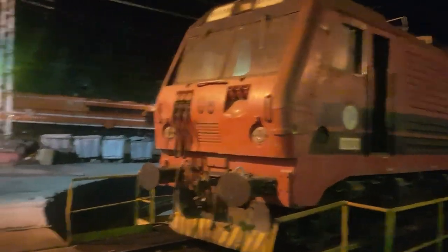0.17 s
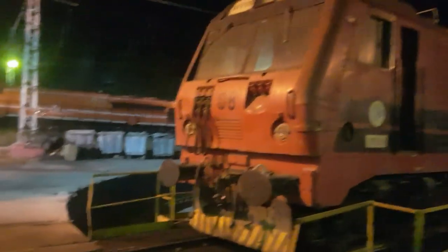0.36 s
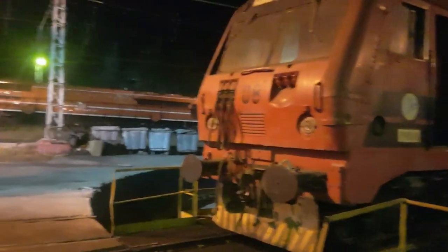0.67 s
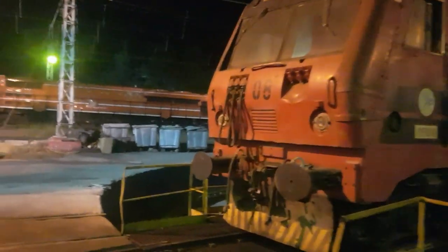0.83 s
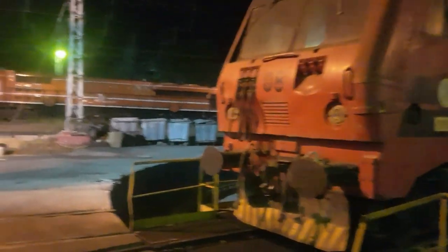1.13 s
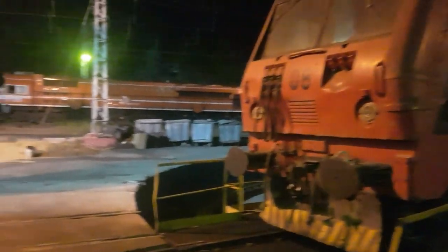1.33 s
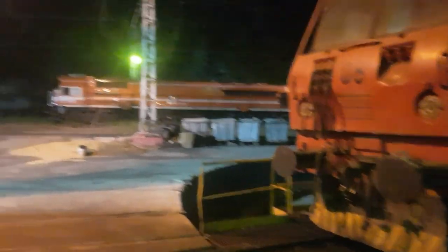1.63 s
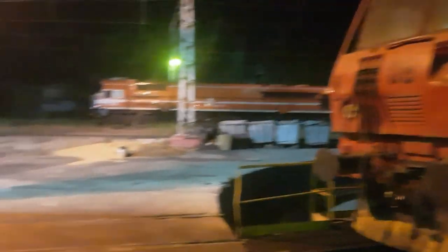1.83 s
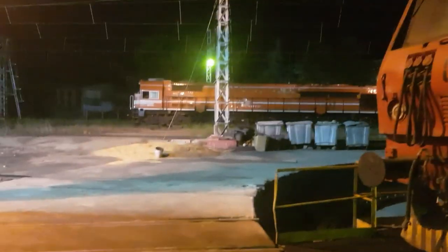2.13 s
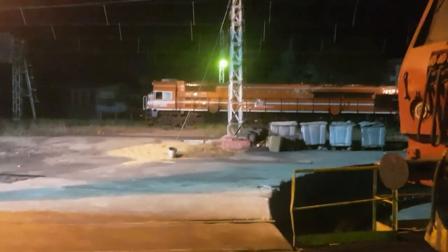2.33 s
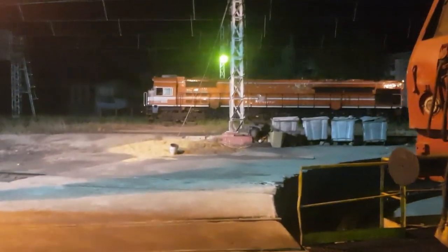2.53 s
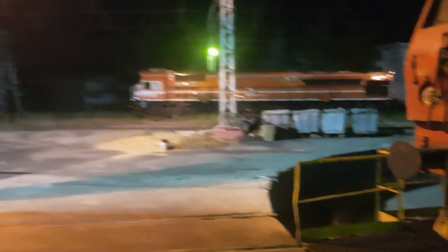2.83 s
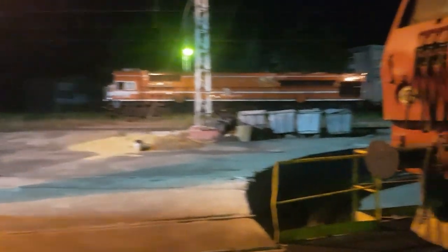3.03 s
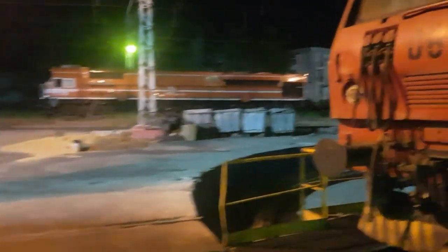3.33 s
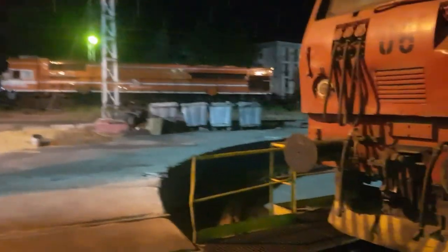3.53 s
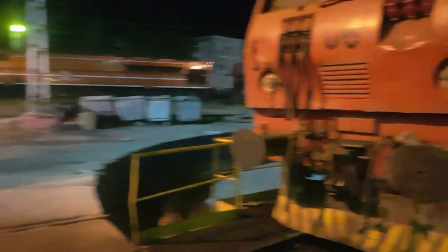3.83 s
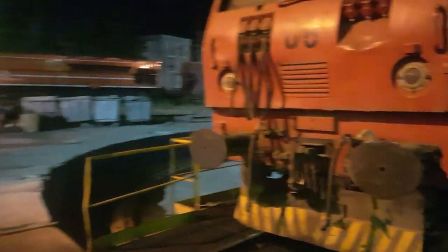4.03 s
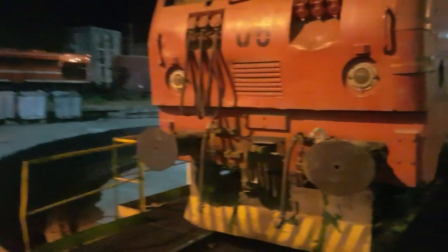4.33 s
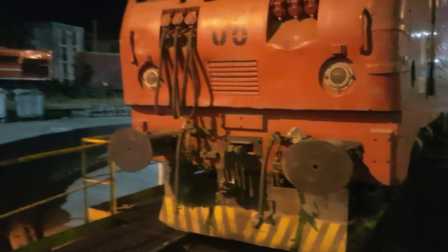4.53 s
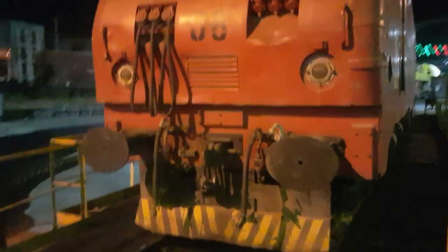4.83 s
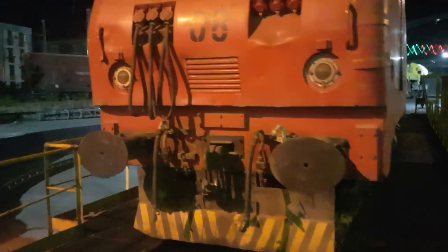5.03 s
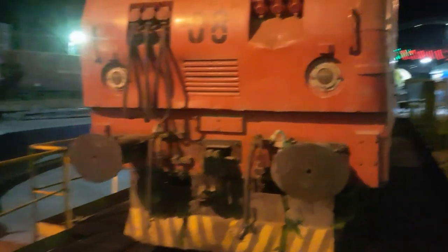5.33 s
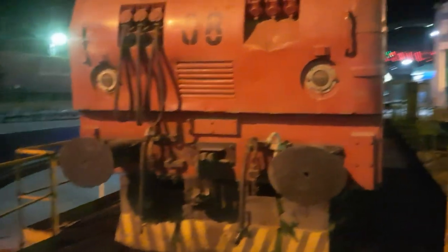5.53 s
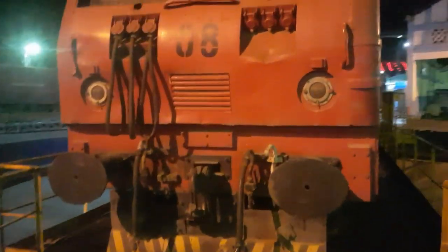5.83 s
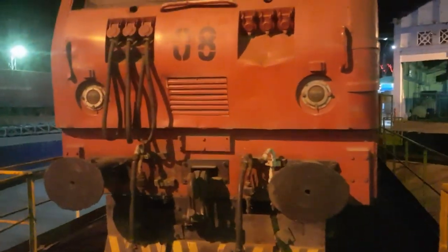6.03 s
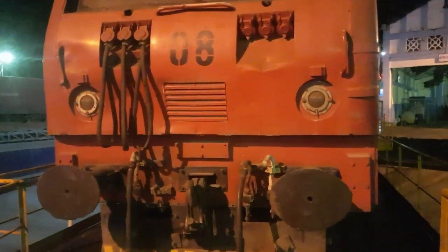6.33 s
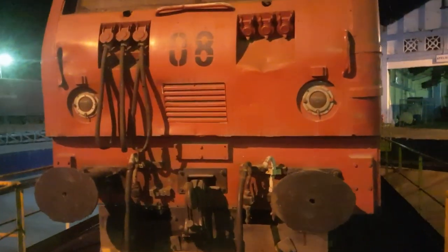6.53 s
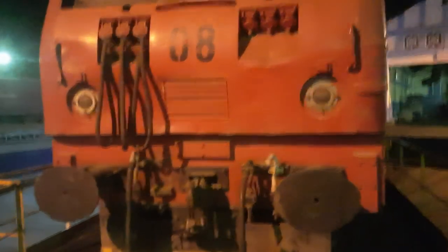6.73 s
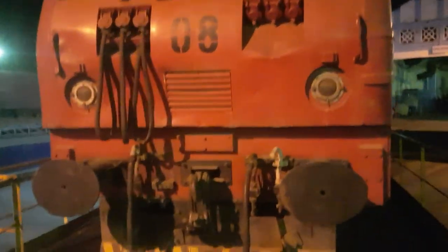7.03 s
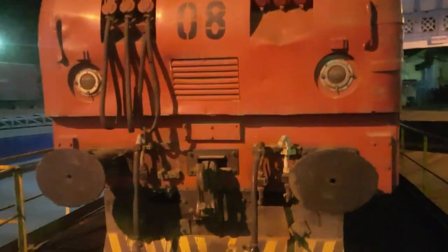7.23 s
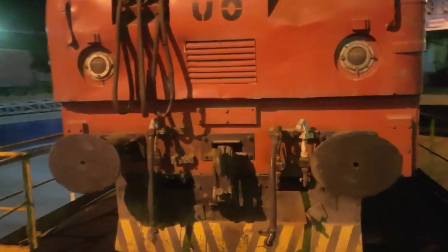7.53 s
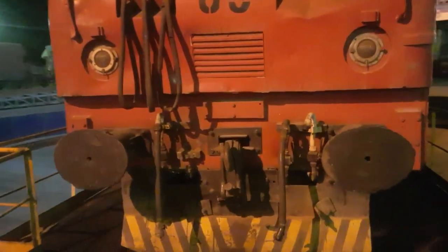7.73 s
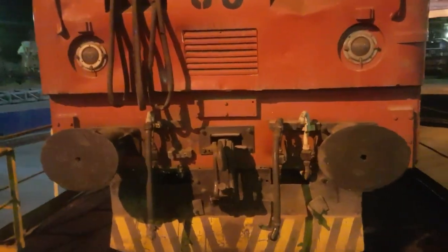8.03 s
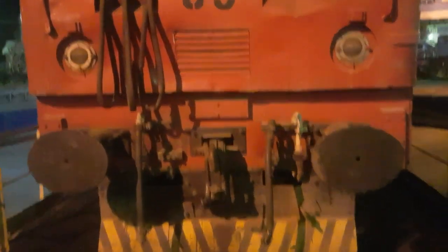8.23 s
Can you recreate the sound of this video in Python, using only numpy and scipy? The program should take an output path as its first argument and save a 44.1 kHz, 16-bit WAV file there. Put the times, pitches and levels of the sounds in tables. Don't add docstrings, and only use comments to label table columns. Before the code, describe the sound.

A big diesel locomotive idles close by at night, deep throbbing exhaust under fan roar and thin whines, with a sharp air-valve spit late on.

```python
import sys
import numpy as np
from scipy import signal
from scipy.fft import rfft, irfft
from scipy.io import wavfile
from scipy.ndimage import uniform_filter1d

SR = 44100
rng = np.random.default_rng(int(sys.argv[2]) if len(sys.argv) > 2 else 0)


def to_wav(sig):
    pcm = np.clip(np.atleast_2d(sig), -1, 1) * 32767
    pcm = np.round(pcm).astype(np.int16)
    wavfile.write(sys.argv[1], SR, pcm.T)


def gain_from_db(level_db):
    decades = np.asarray(level_db, float) / 20
    return 10 ** decades


N = 369558
T = np.arange(N) / SR
HZ = np.maximum(np.arange(N // 2 + 1) * SR / N, 1)
CYCLE_HZ = 4.8409

# strength in dB, lateness in its branch pipe in ms.
CYLINDERS = [
    [(2.7, -0.0), (4.6, -0.4), (2.6, 0.3), (-2.9, -4.0), (0.7, -2.8), (2.3, -3.1), (-14.4, -3.3),
     (2.5, -4.3), (1.8, 3.0), (5.7, -5.0), (-20.0, 5.0), (-12.4, 2.9), (3.2, -0.4), (1.2, -1.7),
     (8.0, -0.3), (4.3, 0.1)],
    [(0.1, 2.3), (-3.7, -5.0), (0.4, -2.8), (-20.0, -0.3), (-0.8, -4.8), (-11.1, 5.0), (-5.2, 1.0),
     (8.0, 1.7), (-2.5, -0.7), (7.7, 2.2), (0.4, 5.0), (6.0, 1.6), (1.2, 3.6), (-1.0, 1.5), (-4.9, -1.8),
     (-3.6, 1.8)],
]
# time in seconds, lag of the right port behind the left in ms.
TURN = [(0, 0.12), (2, -0.038), (3.2, -0.036), (4.2, 0.15), (5.5, 0.31), (8.38, 0.36)]
# opens in seconds, shuts in seconds, echo level on shutting in dB,
# body level in dB, gain lost afterwards in dB.
BLOWS = [
    (-.3, 0.061, -38.5, 1, 5),
    (6.714, 7.068, -42.5, 1.5, 2.5),
]


def curve(table):
    s, *columns = np.transpose(table)
    return [np.interp(T, s, c) for c in columns]


def ring(x, hz, width):
    return signal.lfilter(*signal.iirpeak(hz, hz / width, fs=SR), x)


def walk(rate):
    k = int(SR / rate)
    steps = np.repeat(rng.standard_normal(N // k + 1), k)
    return 1.264 * uniform_filter1d(uniform_filter1d(steps, k), k)[:N]


def swell(start, rise, hold, fall_db_s):
    return np.clip((T - start) / rise, 0, 1) ** 1.5 * gain_from_db(-fall_db_s * np.maximum(T - hold, 0))


def ports(common, left, right, lag_ms=0):
    late = np.interp(T - (curve(TURN)[0] + lag_ms) / 1000, T, common[1])
    return np.array([common[0] + left, late + right])


def air(colour, edges_hz, gains, spread, lag_ms=0):
    # frequency in Hz, share of sound common to both from 0 to 1.
    alike = [(100, 1), (400, 0.9), (900, 0.63), (2300, 0.36), (3500, 0.06), (10000, 0.07), (15000, 0.4)]
    hz, *db = np.transpose(colour)
    tint = gain_from_db(np.array([np.interp(np.log(HZ), np.log(hz), d) for d in db]))
    alike_hz, alike_share = np.transpose(alike)
    share = np.clip(np.interp(np.log(HZ), np.log(alike_hz), alike_share), 0, 1) ** spread
    common, left, right = rfft(rng.standard_normal((3, N)))
    both = tint * common * np.sqrt(share)
    own = tint * np.array([left, right]) * np.sqrt(1 - share)
    place = np.interp(np.log(HZ), np.log(edges_hz), np.arange(len(edges_hz)))
    out = np.zeros((4, N))
    for k, gain in enumerate(gains):
        band = np.cos(np.pi / 2 * np.clip(place - k, -1, 1))
        out += gain * irfft(band * np.vstack([both, own]), N)
    return ports(out[:2], *out[2:], lag_ms)


def strokes(cylinders, scatter_db):
    db, late_ms = np.transpose(cylinders)
    k = np.arange(-64, 16 * 42)
    at = (1 + k / 16 / CYCLE_HZ + late_ms[k % 16] / 1000) * SR
    size = gain_from_db(db[k % 16] + scatter_db * rng.standard_normal(len(k))) * SR / 32 / CYCLE_HZ
    pulses, whole = np.zeros(N + 2 * SR), at.astype(int)
    np.add.at(pulses, whole, size * (1 - at + whole))
    np.add.at(pulses, whole + 1, size * (at - whole))
    return pulses


def exhaust():
    # frequency in Hz, width in Hz, level in dB.
    stacks = [
        [(48.1, 45.0, -2.2), (85.9, 17.7, 12.6), (120.0, 80.0, -30.0)],
        [(30.0, 45.0, -11.5), (80.4, 16.0, 9.5), (159.4, 18.2, -7.4)],
    ]
    # time in seconds, first stack delay in ms, second stack delay in ms.
    delays = [(0, -30.55, 36.38), (1.2, -30.15, 36.47), (2.1, -29.6, 36.62), (3.0, -29.56, 36.54),
              (4.3, -30.6, 36.36), (5.4, -30.7, 36.13), (6.0, -30.33, 36.4), (7.1, -29.5, 37.1),
              (8.38, -29.6, 37.0)]
    # time in seconds, first stack in dB, both stacks' upper resonance in dB.
    shade = [(0, 0, 4), (1.8, 2, 6), (3.0, -1.5, 4), (3.6, -4, 7), (4.75, -1.5, -3), (5.7, -0.5, 3.5),
             (7.8, -2, 2), (8.38, -2, 2.2)]
    # time in seconds, strength from 0 to 1.
    boom_strength = [(0, .9), (1.2, .85), (1.8, .5), (2.4, 0), (8.38, 0)]
    boom_ms, boom_hz, boom_width = 49.1, 76, 7
    first_db, upper_db = curve(shade)
    stack_db = [-25.5 + first_db, -21.5]
    out = 0
    for cylinders, stack, delay_ms, db in zip(CYLINDERS, stacks, curve(delays), stack_db):
        pulses = strokes(cylinders, scatter_db=0.79)
        clock = np.arange(len(pulses))
        sent = (1 + T - delay_ms / 1000) * SR
        rings = [gain_from_db(d) * ring(ring(pulses, hz, w), hz, w) for hz, w, d in stack]
        low, main, upper = (np.interp(sent, clock, r) for r in rings)
        out = out + gain_from_db(db) * (low - main + gain_from_db(upper_db) * upper)
        boom = ring(rings[0] - rings[1], boom_hz, boom_width)
        back = np.interp(sent - boom_ms / 1000 * SR, clock, boom)
        out = out + gain_from_db(db) * curve(boom_strength)[0] * back
    skew = (curve(TURN)[0] + 0.04) / 2000
    pair = np.array([np.interp(T + skew, T, out), np.interp(T - skew, T, out)])
    return pair * gain_from_db(np.array([[-.35], [.35]]))


def block(load_db):
    # frequency in Hz, width in Hz, level in dB.
    modes = [(290, 110, -59), (473.6, 11, -62), (641, 24, -60), (746, 67, -61), (962, 120, -60)]
    # frequency in Hz, rms level in dB.
    shafts = [(188.8, -55), (193.6, -54.5), (232.4, -59), (271.1, -54.5), (457.6, -56), (620, -61.5),
              (660, -64), (705, -68), (737.5, -59.5), (3209, -87), (5502, -82), (6008, -79.5)]
    decay = np.exp(-1 / (.005 * SR))
    burst = signal.lfilter([1], [1, -decay], strokes(CYLINDERS[1], scatter_db=1.2))[SR:SR + N]
    shake = burst / burst.std() * rng.standard_normal((2, N))
    knock = 0
    for hz, width, db in modes:
        knock = knock + gain_from_db(db) * np.sqrt(SR / width) * ring(ring(shake, hz, width), hz, 4 * width)
    tones = 0
    for hz, db in shafts:
        sway_db = 2.5 * walk(3.31)
        tones = tones + gain_from_db(db + sway_db) * np.sqrt(2) * np.sin(2 * np.pi * (hz * T + rng.random()))
    return gain_from_db(load_db) * ports([knock[0] + tones] * 2, 0.13 * knock[1], -.4 * knock[1])


def roar():
    # frequency in Hz, left in dB per Hz, right in dB per Hz.
    colour = [(30, -8.5, -8), (114, 2.5, -7.5), (253, -4, -3.5), (447, -8, -8.5), (638, 1, 4.5),
              (1068, -8, -8), (1900, -12, -8.5), (2340, -4.5, -9), (3053, -14, -26.5), (4250, -37.5, -23.5),
              (6120, -52.5, -28.5), (8800, -63, -46.5), (9360, -63, -40), (12900, -60, -50.5)]
    # time in seconds, level in dB.
    louvres = [(0, 0.5), (2.3, 4), (3.9, -1), (5.6, 1), (6.9, 2.5), (8.38, 2)]
    open_db = curve(louvres)[0]
    centres = 60 * 2 ** np.arange(0, 8.1, .8)
    breath = np.cos(2 * np.pi * (CYCLE_HZ * T - .25))
    gains = []
    for hz in centres:
        if hz < 2000:
            tilt_db = 0
        elif hz < 3500:
            tilt_db = open_db
        else:
            tilt_db = 3 - .3 * open_db + 1
        if hz > 8000:
            tilt_db = tilt_db + 2.6 * breath + 0.66 * open_db - 3.5
        flicker_db = .6 * walk(2.5) + 0.83 * walk(12)
        gains.append(gain_from_db(-43 + tilt_db + flicker_db + 18))
    return air(colour, centres, gains, spread=0.99)


def ground(x):
    # time in seconds, extra path in ms, strength from 0 to 1.
    bounce = [(0, 1.8, .4), (.6, 1.8, .62), (2.4, 1.78, .62), (3.1, 1.74, .55), (3.6, 1.66, .3),
              (5, 1.66, .28), (8.38, 1.7, .3)]
    ms, strength = curve(bounce)
    dull = signal.filtfilt(*signal.butter(2, 2000, fs=SR), x)
    return x - np.clip(strength, 0, 1) * np.array([np.interp(T - ms / 1000, T, c) for c in dull])


def whine(hz, table, width, steady, throb_db, throb_at, fade_db, sway_db):
    db = curve(table)[0] + fade_db * walk(3.5)
    pan_db = sway_db * walk(3)
    rough = ring(ring(rng.standard_normal((3, N)), hz, width), hz, width)
    rough = rough / rough.std()
    drifting_hz = hz + 2.5 * walk(6)
    tone = steady * np.sin(2 * np.pi * np.cumsum(drifting_hz) / SR) + 0.64 * rough[0]
    throb = throb_db * np.cos(2 * np.pi * (CYCLE_HZ * T - throb_at))
    gain = gain_from_db(db + throb + np.array([pan_db, -pan_db]) / 2)
    return gain_from_db(4.0) * ports(gain * tone, *(gain * rough[1:]))


def gear():
    # time in seconds, level in dB.
    level = [(0, -48), (.7, -52.5), (2.2, -51.5), (2.8, -48), (3.4, -49), (4.1, -58), (4.5, -50.5),
             (5.6, -55.5), (6.1, -54), (6.8, -50), (7.301, -53), (8.38, -53.5)]
    return whine(2135, level, width=24, steady=0.41, throb_db=2.5, throb_at=0.11, fade_db=-0.4, sway_db=4.5)


def blower():
    # time in seconds, level in dB.
    level = [(0, -57.5), (1.0, -56.5), (1.6, -57), (3.3, -59), (4.8, -62.5), (6.5, -57), (7.0, -62.5),
             (7.6, -58), (8.38, -58.5)]
    return whine(4361, level, width=50, steady=0.78, throb_db=0.8, throb_at=0.8, fade_db=-1.4, sway_db=4)


def near_valve():
    # frequency in Hz, left in dB per Hz, right in dB per Hz.
    jets = [
        [(120, -10, -12), (255.6, -16, -16), (450, -15.5, -17.5), (715, -20, -16), (1060, -16, -10), (1770, -4.5, -6), (2370, -3, -7), (3020, -8.5, -22), (5060, -20, -8), (6460, -22, -12.5), (7920, -33.5, -15), (9540, -27.5, -15.5), (13000, -31, -7), (16400, -41, -25)],
        [(120, -8, -20), (250, -13, -11), (450, -14, -13.5), (690, -19, -28), (1020, -8.5, -6), (1730, -6.5, -11), (2250, 0, 0), (3080, -13, -23), (4860, -18.5, -7.5), (5970, -22.5, -7.5), (8460, -40, -20.5), (9360, -32.5, -19.5), (13300, -28.5, -9), (16300, -34, -20.5)],
    ]
    # start in seconds, level in dB, fall in dB per second.
    spurt_sets = [
        [(-0.041, -24, 269.5)],
        [(6.721, -26, 66), (6.88, -32.5, 141), (7.005, -36, 260)],
    ]
    # frequency in Hz, width in Hz, boost in dB.
    hollow_sets = [
        [(2000, 300, 1.5), (2650, 300, 0), (4900, 450, 13)],
        [(1680, 150, 4), (2085, 90, 9), (2480, 150, 6), (2750, 110, 0), (12800, 500, 1.5)],
    ]
    # level in dB, fall in dB per second.
    yard = [
        (10.5, 29.5),
        (3, 48.5),
        (-6, 100),
    ]
    rise_s, hold_s, sizzle_db = 0.03, 0.017, 4.5
    edges_hz, trims = [2200, 5500, 11000], gain_from_db(np.array([-4, 0, -.5]))
    lags_ms = .16, -.05
    out = 0
    for colour, blow, spurts, hollows, lag_ms in zip(jets, BLOWS, spurt_sets, hollow_sets, lags_ms):
        opens, shuts, echo_db, body_db, _ = blow
        power = 0
        for s, db, fall in spurts:
            power = power + (gain_from_db(db) * swell(s, rise_s, s + rise_s + hold_s, fall)) ** 2
        flow = np.sqrt(power)
        sputter = gain_from_db(1.3 * walk(45) + 21.5)
        gains = [sputter * trim * gain_from_db(db) * flow for db, trim in zip([body_db, 0, sizzle_db], trims)]
        jet = air(colour, edges_hz, gains, spread=.14, lag_ms=lag_ms)
        echoes = [gain_from_db(echo_db + db) * swell(opens, 0.17, shuts, fall) for db, fall in yard]
        echo_gains = [gain_from_db(21) * trim * echo for echo, trim in zip(echoes, trims)]
        echo = air(colour, edges_hz, echo_gains, spread=.45, lag_ms=lag_ms)
        singing = (flow / flow.max()) ** .7 * gain_from_db(0) * np.array([[1], [1]])
        singing = singing * gain_from_db(np.array([[.7], [-.7]]))
        out = out + jet + echo + singing * sum(gain_from_db(boost) * ring(jet, hz, w) for hz, w, boost in hollows)
    return out


def far_valves():
    # start in seconds, rise in seconds, fall in seconds, centre in Hz, level in dB.
    puffs = [
        (.307, 0.0044, .005, 13840, -57),
        (4.13, 0.06, .07, 13100, -66),
        (4.13, .07, 0.13, 10000, -68.5),
        (5.78, .13, 0.11, 12400, -63.5),
        (6.09, .03, .03, 10900, -69.5),
    ]
    out = 0
    for start, rise, fall, hz, db in puffs:
        shape = np.clip((T - start) / rise, 0, 1) ** 2 * np.exp(-np.maximum(T - start - rise, 0) / fall)
        width = 0.41 * hz
        hush = ring(ring(rng.standard_normal((2, N)), hz, width), hz, width)
        out = out + gain_from_db(db + np.array([[-9], [3]])) * shape * hush * 3
    return out


def ticks():
    # time in seconds, peak in dB, pitch in Hz.
    taps = [
        (0.8624, -36.5, 2130),
        (0.9822, -35, 2140),
        (1.1019, -35, 2130),
        (1.2246, -32.5, 2050),
        (1.3464, -37, 2200),
        (1.5798, -41, 2090),
        (3.3662, -38, 2130),
    ]
    out = np.zeros(N)
    for s, db, hz in taps:
        age = np.maximum(T - s, 0)
        out += gain_from_db(db) * np.exp(-age / 0.0034) * np.sin(2 * np.pi * hz * age)
    return gain_from_db(4.5) * out * gain_from_db(np.array([[-3], [2]]))


def scene():
    engine = exhaust() + ground(block(load_db=-0.63) + roar())
    return engine + gear() + blower() + near_valve() + far_valves() + ticks()


def top_cut(x):
    return signal.sosfilt(signal.butter(12, 16010, fs=SR, output="sos"), x)


def record(dry):
    sink_s, hold_s, return_s = 0.34, 2.41, 0.75
    times = [0, sink_s, hold_s, hold_s + return_s]
    lost_db = sum(db * np.interp(T - opens, times, [0, 1, 1, 0]) for opens, *_, db in BLOWS)
    heard = dry * gain_from_db(-lost_db)
    hiss = signal.sosfilt(signal.butter(4, 9000, "high", fs=SR, output="sos"), rng.standard_normal(N))
    heard = heard + gain_from_db(-77) * hiss
    heard = signal.sosfilt(signal.butter(6, 34, "high", fs=SR, output="sos"), heard)
    dead_hz, dead_width = 8050, 800
    heard = heard - ring(heard, dead_hz, dead_width)
    heard = heard - ring(heard, dead_hz + 200, dead_width / 2)
    heard = signal.sosfilt(signal.ellip(10, .5, 70, 15720, fs=SR, output="sos"), heard)
    return top_cut(heard)


dry = scene()
out = record(dry)
to_wav(out)
```